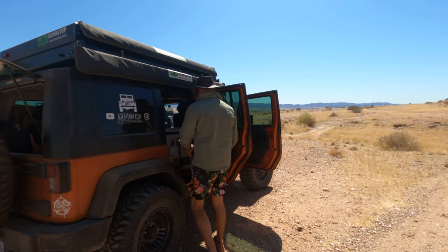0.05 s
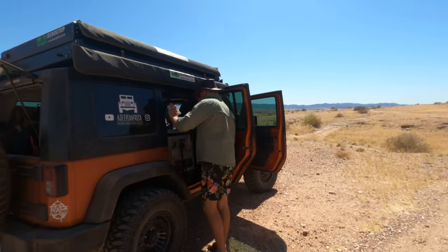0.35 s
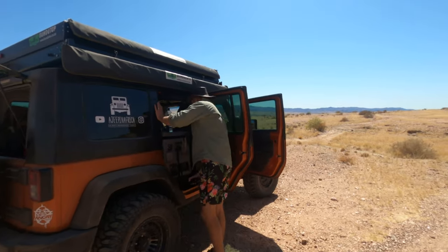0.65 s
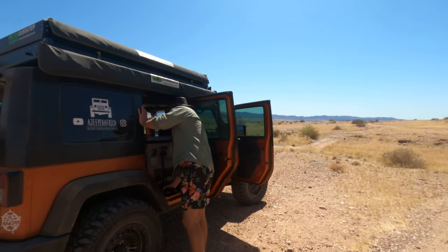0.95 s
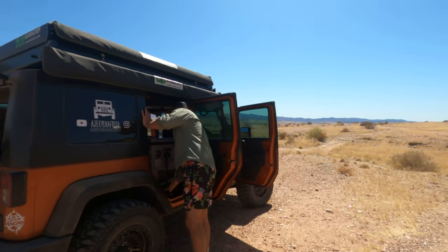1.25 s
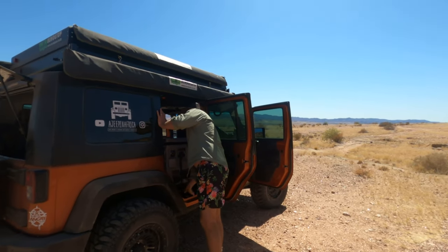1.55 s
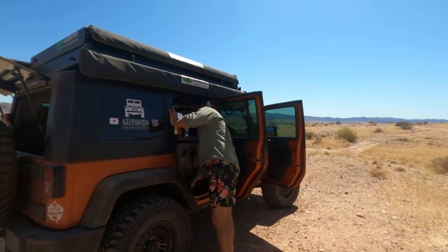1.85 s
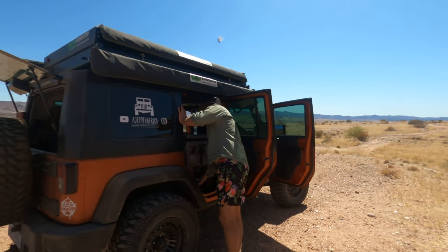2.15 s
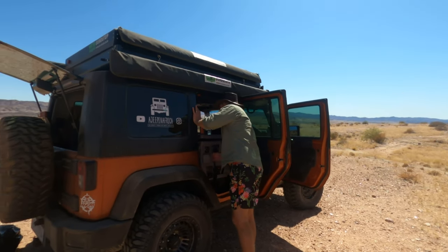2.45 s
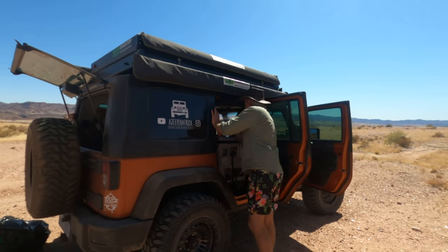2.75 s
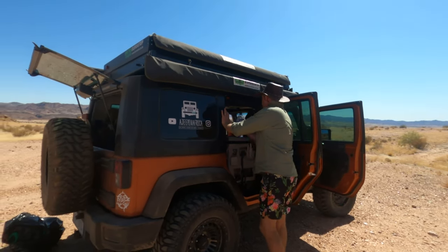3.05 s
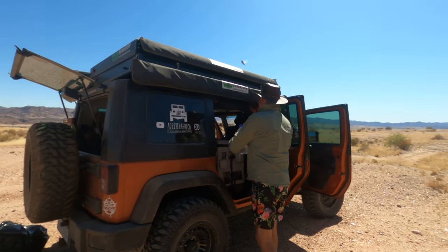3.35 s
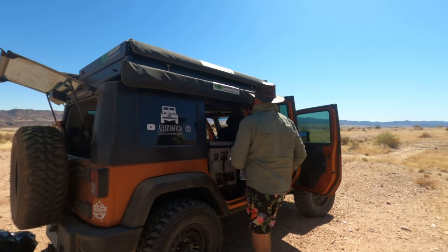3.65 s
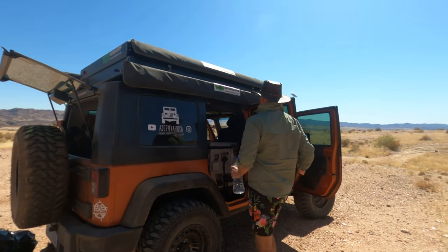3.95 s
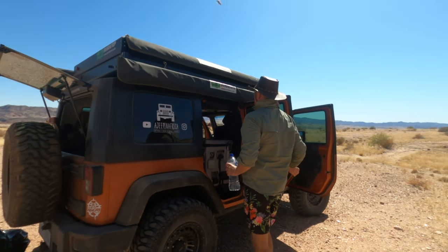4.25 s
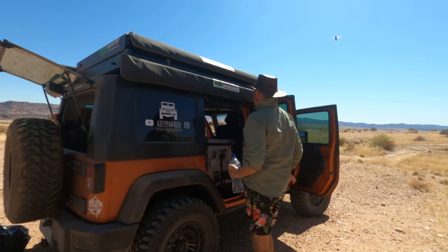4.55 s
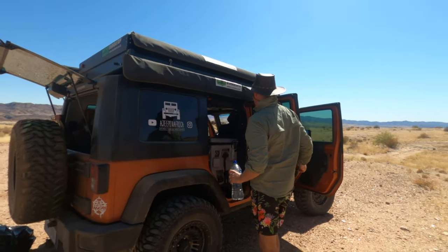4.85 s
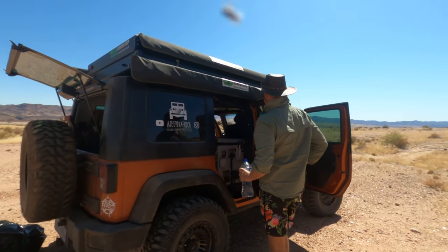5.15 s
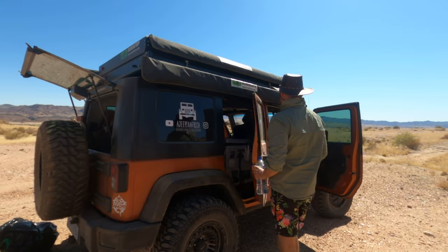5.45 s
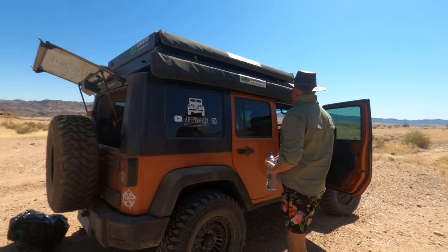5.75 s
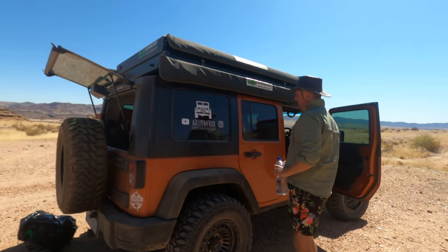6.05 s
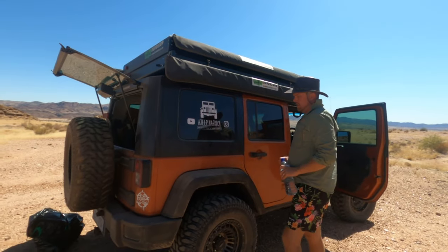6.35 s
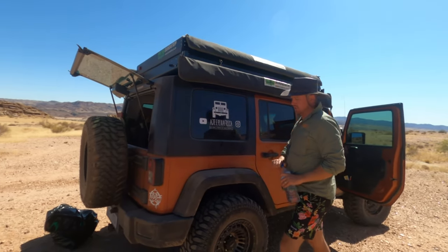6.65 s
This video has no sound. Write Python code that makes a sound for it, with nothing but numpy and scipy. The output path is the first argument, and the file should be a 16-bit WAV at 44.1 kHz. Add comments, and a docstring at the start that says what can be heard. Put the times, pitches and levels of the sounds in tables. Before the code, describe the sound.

Someone digs through the load of a parked vehicle, with rustling clothes, light plastic clicks, hollow knocks and the thump of a closing lid. Gravel crunches underfoot, there is a brief lull, and then a door slams shut, the loudest sound, before some last scuffs and taps. It is heard from a few steps away in the open air, with soft gusts buffeting the microphone.

```python
"""An off-road vehicle stands in open desert; a light breeze buffets the microphone under a faint hiss.
Someone rummages inside: sleeves rub, hollow plastic items tap, cargo knocks, a lid shuts and a buckle
rings once. He steps back over crunching gravel and, near the end, slams the side door:
the latch clashes, the door thuds into its seal, the cabin booms. A few scuffs and taps follow."""
import sys
import numpy as np
from scipy import signal
from scipy.fft import rfft, irfft, next_fast_len
from scipy.io import wavfile
from scipy.ndimage import uniform_filter1d, map_coordinates

SR = 44100
rng = np.random.default_rng(int(sys.argv[2]) if len(sys.argv) > 2 else 0)


def master_out(mix):
    """Clip the mix to full scale and print it as 16-bit PCM to the path in sys.argv[1]."""
    frames = np.transpose(np.atleast_2d(mix))
    ceiling = np.clip(frames, -1, 1)
    pcm = np.round(ceiling * 32767).astype(np.int16)
    wavfile.write(sys.argv[1], SR, pcm)


N = 295470
T = np.arange(SR // 2) / SR  # time within one hit [s]
TOP_HZ = 15800

# low rumble of the breeze: (frequency [Hz], spectral level [dB])
BREEZE_SPECTRUM = [(1, -11.5), (3, 6.5), (9, -4), (14, -13.5), (20, -16), (28, -38.5), (40, -34), (80, -55),
                   (200, -54), (600, -100)]
# gusts and one lull: (time [s], level change [dB], width [s])
BREEZE_GUSTS = [(0.55, 9, 0.28), (0.93, 10.5, 0.11), (1.45, 5.5, 0.21), (2.35, 7.5, 0.25),
                (5.6, 10.5, 0.11), (6.3, -5.5, 0.34)]
# bed of hiss: (frequency [Hz], spectral level [dB])
HISS_SPECTRUM = [(35, -19), (60, -2), (254, -11.5), (292, -9.5), (352, -12.5), (511, -10), (616, -11),
                 (760, -12.5), (1680, -16), (2020, -18), (2430, -17.5), (15700, -27)]
# strokes of a sleeve, packet or sole: (start [s], length [s], rub level [dB], grit level [dB])
RUB_STROKES = [(-0.01, 0.079, -53, -54.5), (0.21, 0.05, -59, -59), (0.28, 0.22, -58.5, -68.5),
               (0.424, 0.043, -50.5, -56), (0.5, 0.077, -64, -71), (0.75, 0.048, -65, -85),
               (0.85, 0.11, -63, -67), (1.17, 0.061, -57.5, -65), (1.34, 0.15, -68, -77),
               (1.765, .19, -59, -64), (1.98, .13, -68.5, -68), (2.68, 0.088, -65.5, -84),
               (3.1, 0.089, -65, -74), (3.192, 0.037, -55.5, -61.5), (3.288, 0.03, -55.5, -63.5),
               (3.35, 0.1, -59.5, -60.5), (3.47, 0.058, -59.5, -65), (3.58, 0.17, -67.5, -64.5),
               (3.715, .14, -57, -63.5), (3.985, .03, -48.5, -56.5), (4.03, 0.032, -54.5, -56.5),
               (4.12, .6, -68.5, -81), (5.745, 0.1, -58, -68), (5.95, 0.12, -47, -57),
               (6.075, .055, -49.5, -50), (6.15, .055, -52, -53), (6.58, .12, -66, -65.5)]
# soft body of a rub: (frequency [Hz], spectral level [dB])
RUB_SPECTRUM = [(90, -12), (220, 1), (430, 0), (590, 0.5), (720, 1), (1050, 0), (1500, -3.5), (2200, -7),
                (4500, -29)]
# crackling grit: (frequency [Hz], spectral level [dB])
GRIT_SPECTRUM = [(200, -12), (600, 8), (1700, -6), (3000, -10.5), (5500, -13), (9000, -18.5), (10500, -23),
                 (15500, -33)]
# hollow plastic items touching: (time [s], peak [dB], pitch [Hz], click against ring [dB])
PLASTIC_TAPS = [(0.012, -35, 1634, 1), (0.061, -37, 1040, 1.5), (0.4724, -34, 1337, -3.5),
                (1.080, -44.5, 884, -1), (2.243, -36.5, 1023, -1.5), (2.9815, -28.5, 790, -15),
                (2.997, -32.5, 1330, -9), (3.012, -40.5, 590, -17), (3.2301, -34, 733, -27),
                (3.252, -32.5, 568, -9), (3.350, -44.5, 590, -4), (3.511, -29.5, 1155, -2.5),
                (3.516, -33, 947, 2.5), (3.553, -30, 1020, 11), (4.697, -51, 800, -6),
                (5.2473, -49.5, 890, 14), (5.791, -36, 1350, -6), (6.047, -33, 846, -1.5),
                (6.516, -42.5, 945, 2)]
# reverb decay of the cabin: (frequency [Hz], t60 [s])
CABIN_DECAY = [(100, 0.55), (400, 0.44), (1500, 0.32), (5000, 0.34), (14000, 0.099)]
# stones underfoot and thin plastic: (time [s], peak [dB], t60 [s], tone centre [Hz])
DRY_CRUNCHES = [(0.243, -40, 0.054, 5030), (1.6653, -35.5, 0.061, 6160), (1.801, -45.5, 0.15, 4150),
                (1.838, -41.5, 0.051, 4200), (2.543, -47.5, 0.056, 7000), (2.664, -44.5, 0.028, 6500),
                (3.545, -40.5, 0.052, 6500), (3.880, -39.5, 0.071, 6000), (3.971, -34.5, 0.057, 1790),
                (3.977, -28, 0.1, 4240), (4.055, -37, 0.099, 2400), (6.242, -42, 0.058, 3500),
                (6.298, -42, 0.16, 2770), (6.447, -47, 0.058, 2160), (6.501, -37.5, 0.047, 4200),
                (6.524, -40, 0.021, 5800), (6.642, -41, 0.015, 3000), (6.665, -41, 0.014, 3500)]
# hollow knocks: cargo bumping, a lid shutting (1.25 s), one footstep (3.97 s):
# (time [s], peak [dB], tone centre [Hz], spread [octaves], clack against ring [dB], damping t60 [s])
HOLLOW_KNOCKS = [(0.4747, -31.5, 470, 0.23, -35, 0.24), (0.4756, -35.5, 218, 0.2, -33, 0.19),
                 (0.785, -47, 260, 0.16, -31, .2), (1.2442, -23.5, 950, 0.98, -8.5, 0.55),
                 (1.2506, -21, 587, 0.71, -22, 3.4), (1.455, -40.5, 174, 0.27, -34, 0.24),
                 (1.467, -38.5, 196, 0.17, -30, 0.34), (1.506, -46, 388, 0.22, -20, .4),
                 (1.533, -43, 400, 0.4, -23, .3), (1.670, -39, 420, 0.63, -30, 0.81),
                 (1.875, -40, 218, 0.27, -7, 0.17), (2.664, -42.5, 500, 0.41, -31, 0.14),
                 (2.985, -42.5, 480, 0.44, -28, 0.11), (3.236, -46, 382, 0.5, -28, 0.17),
                 (3.972, -34.5, 546, 0.37, -22, 0.096), (5.567, -49, 165, 0.48, -23, .6)]
# hollow ring shared by the knocks: (frequency [Hz], level [dB], t60 [s])
KNOCK_MODES = [(122, -18, 0.25), (180, -4, .13), (203, 4, 0.14), (286.7, 5, 0.18), (358, 2, 0.12),
               (386, -10, 0.25), (433, -6.5, 0.22), (515, -0.5, 0.19), (554, 2, 0.16), (724.5, 2, 0.16),
               (869, -3, 0.18), (1264, -8, 0.11), (1388, 3.5, 0.043), (1550, -8, 0.12), (2840, -1, 0.077)]
# heels settling on the ground: (time [s], peak [dB])
HEEL_DROPS = [(1.44, -38.5), (2.815, -50), (3.759, -47), (4.691, -46), (5.56, -41.5)]
# ring of a small metal buckle: (frequency [Hz], level [dB], t60 [s])
BUCKLE_MODES = [(4520, -7, 0.2), (6100, 3, 0.072)]
# latch and window rattling: (time [s], peak [dB], clash against ring [dB], low-pass cutoff [Hz])
LATCH_HITS = [(5.8299, -20.5, -7, 1100), (5.8367, -8.5, 1, 2200), (5.8425, -9, 4.5, 14000),
              (5.8482, -10.5, 13, 14000), (5.853, -15.5, 11, 12000), (5.8750, -16.5, 21, 13000),
              (5.881, -37, 15, 8000), (5.9037, -22, 10, 2200), (5.91, -34, 18, 2200), (5.916, -25, 5, 3500)]
# noisy clash of the latch: (frequency [Hz], spectral level [dB])
CLASH_SPECTRUM = [(90, -26), (160, -3.5), (420, -7.5), (740, -18), (860, -6.5), (1020, -20), (1260, -13),
                  (2650, -17), (4300, -20), (6600, -24), (8800, -20.5), (10200, -34), (12700, -27.5),
                  (15500, -43)]
# ring of the latch steel: (frequency [Hz], level [dB], t60 [s])
STEEL_MODES = [(520, -3, 0.12), (607, -14, 0.2), (817, -4, 0.079), (869, 5.5, 0.09), (1246, -4.5, 0.13),
               (1830, -20.5, 0.09), (2190, -21, 0.11), (2380, -6, 0.071), (3079, -10, 0.07),
               (4280, -8, 0.065), (4970, -19, .11), (5600, -20.5, 0.082), (7800, -29, .08),
               (8580, -13, 0.117), (9100, -6, 0.055)]
# door meeting its seal: (time [s], peak [dB])
DOOR_THUDS = [(5.837, -18), (5.8755, -5.5), (5.8824, -13.5), (5.904, -21.5)]
# ring of the door panel: (frequency [Hz], level [dB], t60 [s])
PANEL_MODES = [(92.7, 3.5, 0.13), (138.5, -6.5, 0.15), (194, -3, 0.17), (250, 2.5, 0.12),
               (265, -2.5, 0.045), (318, -2, 0.045), (400, -5.5, 0.24), (510, -6.5, 0.067),
               (546, -11, 0.16), (677, -7, 0.045)]


def amp(db):
    """Decibels to gain."""
    return 10 ** (np.asarray(db) / 20)


def unit(x):
    """Scale to rms 1."""
    return x / np.sqrt(np.mean(x ** 2) + 1e-20)


def along(points, hz):
    """Read a curve of (frequency [Hz], value) points on a log-frequency axis."""
    point_hz, values = np.transpose(points)
    return np.interp(np.log(hz + 1e-3), np.log(point_hz), values)


def hump(hz, centre_hz, octaves):
    """Broad band-pass EQ curve in dB."""
    return -10 * np.log10(1 + (np.log2(hz / centre_hz) / octaves) ** 4)


def colour(x, spectrum):
    """EQ a signal by (frequency [Hz], level [dB]) points and scale to rms 1."""
    size = next_fast_len(len(x) + 8192)
    gain = amp(along(spectrum, np.fft.rfftfreq(size, 1 / SR)))
    return unit(irfft(rfft(x, size) * gain, size)[:len(x)])


def noise(spectrum, count=len(T)):
    """Coloured noise, one hit long by default."""
    return colour(rng.standard_normal(count), spectrum)


def band(x, hz, kind):
    """Gentle low or high pass."""
    return signal.sosfilt(signal.butter(2, hz, kind, fs=SR, output="sos"), x)


def fade(t60, attack_s):
    """Envelope of one hit."""
    return np.exp(-np.log(1000) * T / t60) * (1 - np.exp(-T / attack_s))


def ring(modes, scatter_db, detune):
    """Damped modes; every contact point excites them a little differently."""
    hz, db, t60 = np.transpose(modes)[:, :, None]
    size, shift = rng.standard_normal((2, len(modes), 1))
    sign = (-1) ** np.arange(len(modes))[:, None]
    swing = np.sin(2 * np.pi * hz * (1 + detune * shift) * T)
    decay = np.exp(-np.log(1000) * T / t60)
    return unit(np.sum(sign * amp(db + scatter_db * size) * decay * swing, axis=0))


def grains(count, per_second, spread_db):
    """Tiny snaps of random size at random moments."""
    snaps = (rng.random(count) < per_second / SR) * rng.standard_normal(count)
    return snaps * amp(spread_db * rng.standard_normal(count))


def place(track, s, peak_db, sound):
    """Mix a hit in at s seconds, peaking at peak_db."""
    part = track[round(s * SR):][:len(sound)]
    part += amp(peak_db) * sound[:len(part)] / (np.abs(sound).max() + 1e-20)


def breeze(calm_db=-35.5):
    """Slow pressure swings that swell in a few gusts."""
    t = np.arange(N) / SR
    gust_db = sum(db * np.exp(-((t - s) / width) ** 2) for s, db, width in BREEZE_GUSTS)
    return amp(calm_db + gust_db) * noise(BREEZE_SPECTRUM, N)


def hiss():
    """A faint, even bed under the whole scene."""
    return amp(-63) * noise(HISS_SPECTRUM, N)


def stroke(start, length, attack_s=0.011, release_t60=0.15):
    """Envelope of one rub: it takes hold, slides on and dies away."""
    t = np.arange(N) / SR - start
    release = np.exp(-np.log(1000) * np.maximum(t - length, 0) / release_t60)
    return np.clip(t / attack_s, 0, 1) * release


def sliding(x, depth_db):
    """Brief resonances come and go as the contact slides over different things."""
    frames = signal.stft(x, nperseg=512)[2]
    patches = uniform_filter1d(rng.standard_normal(frames.shape), size=4, axis=0)  # across frequency
    patches = uniform_filter1d(patches, size=14, axis=1)  # across time
    return unit(signal.istft(frames * amp(depth_db * unit(patches)), nperseg=512)[1][:N])


def catch_and_slip(per_second, depth_db):
    """Smooth random gain of a contact that catches and slips."""
    position = np.arange(N) * per_second / SR
    return amp(depth_db * map_coordinates(rng.standard_normal(N // 100), [position], mode="wrap"))


def shuffling():
    """Sleeves and soles rub stroke by stroke while grit crackles on top."""
    rub = colour(grains(N, per_second=1100, spread_db=1), RUB_SPECTRUM)
    grit = colour(grains(N, per_second=1600, spread_db=-0.5), GRIT_SPECTRUM)
    rub = sliding(rub, depth_db=3)
    grit = sliding(band(grit, 1700, "high"), depth_db=2.5)
    rummage = (0, 2.0, -69, -71.5)  # one long, faint stroke: clothes stir as he digs through the load
    rub_power, grit_power = np.zeros((2, N))
    for s, length, rub_db, grit_db in [*RUB_STROKES, rummage]:
        envelope = stroke(s, length)
        rub_power += (amp(rub_db) * envelope) ** 2
        grit_power += (amp(grit_db) * envelope) ** 2
    friction = np.sqrt(rub_power) * rub + np.sqrt(grit_power) * grit
    return friction * catch_and_slip(per_second=45, depth_db=1)


def taps(t60=0.042):
    """A thin plastic wall rings briefly, with a click on top."""
    out = np.zeros(N)
    for s, db, hz, click_db in PLASTIC_TAPS:
        upper_hz = 1.42 * hz
        upper_db = -6 + hump(upper_hz, centre_hz=775, octaves=0.75)
        modes = [(0.82 * hz, -14, t60), (hz, 0, t60), (upper_hz, upper_db, 0.8 * t60)]
        wall = ring(modes, scatter_db=1, detune=0.01)
        click = noise([(200, -10), (500, 11), (2800, 1), (5000, -14), (9000, -23.5), (15000, -35)])
        place(out, s, db, wall + amp(click_db) * unit(click * fade(t60, 0.00022)))
    return out


def cabin_reverb(send, predelay_s=0.006):
    """The hollow vehicle and the ground answer with a short tail."""
    hz, t, frames = signal.stft(rng.standard_normal(SR), SR, nperseg=256)
    decay = np.exp(-np.log(1000) * t / along(CABIN_DECAY, hz)[:, None])
    tail = signal.istft(frames * decay, SR, nperseg=256)[1]
    response = np.pad(tail, (round(predelay_s * SR), 0)) / np.linalg.norm(tail)
    return signal.fftconvolve(send, response)[:N]


def crunches():
    """Stones and thin plastic give way in dry clumps of tiny snaps."""
    out = np.zeros(N)
    for s, db, t60, centre_hz in DRY_CRUNCHES:
        tone = [(hz, along(GRIT_SPECTRUM, hz) + hump(hz, centre_hz, octaves=1.2))
                for hz in np.geomspace(20, SR / 2, 40)]
        snaps = colour(grains(len(T), per_second=10000, spread_db=3), tone)
        place(out, s, db, snaps * fade(t60, 0.00029))
    return out


def knocks():
    """Cargo, a lid and one footstep: soft hits stir low modes; hard ones reach higher and clack."""
    out = np.zeros(N)
    for s, db, centre_hz, octaves, clack_db, damping_t60 in HOLLOW_KNOCKS:
        tone = [(hz, hump(hz, centre_hz, octaves) - 20 * np.log10(1 + hz / centre_hz))
                for hz in np.geomspace(20, SR / 2, 40)]
        clutter = unit(noise(tone) * fade(0.14, 0.0015))  # loose things shaken by the hit
        clack = noise([(300, -16), (1400, 6.5), (2900, 13.5), (4500, 6.5), (8000, -33), (15000, -40)])
        clack = unit(clack * fade(0.068, 0.00079))
        modes = [(hz, level + hump(hz, centre_hz, octaves), t60) for hz, level, t60 in KNOCK_MODES]
        body = ring(modes, scatter_db=1, detune=0.003)
        knock = body + 0.56 * clutter + amp(clack_db) * clack
        place(out, s, db, knock * fade(damping_t60, 0.00016))
    return out


def footfalls():
    """Each heel sends one dull push through the ground."""
    out = np.zeros(N)
    for s, db in HEEL_DROPS:
        push = noise([(25, -2), (60, 4), (110, -8), (220, -38), (600, -50)])
        place(out, s, db, push * fade(0.115, 0.0067))
    return out


def buckle():
    """One contact sets a small metal buckle ringing."""
    out = np.zeros(N)
    place(out, s=1.667, peak_db=-53, sound=ring(BUCKLE_MODES, scatter_db=-2, detune=0))
    return out


def latch():
    """The latch rides over its striker in a rattle of steel; rubber muffles the light contacts."""
    out = np.zeros(N)
    for s, db, clash_db, cutoff_hz in LATCH_HITS:
        clash = unit(noise(CLASH_SPECTRUM) * fade(0.05, 0.00035))
        steel = ring(STEEL_MODES, scatter_db=1.5, detune=0.002)
        place(out, s, db, band(steel + amp(clash_db) * clash, min(cutoff_hz, TOP_HZ), "low"))
    return out


def door_thuds(seal_hz=250):
    """The door lands: panel and trim shake while the seal gives way for a few cycles."""
    out = np.zeros(N)
    for s, db in DOOR_THUDS:
        trim = noise([(40, -10), (100, 4), (400, 15.5), (900, 6), (3000, -33)])
        trim = unit(trim * fade(0.13, 0.00078))
        panel = ring(PANEL_MODES, scatter_db=0.7, detune=0.002)
        seal = unit(np.sin(2 * np.pi * seal_hz * T) * fade(0.024, 0.003))
        place(out, s, db, panel + 0.99 * seal + 0.5 * trim)
    return out


def cabin_boom(s=5.917, hz=44, peak_db=-20, width_s=0.029):
    """The closing door squeezes the cabin air into one deep pulse."""
    t = np.arange(N) / SR - s
    return -amp(peak_db) * np.exp(-(t / width_s) ** 2) * np.cos(2 * np.pi * hz * t)


def scene():
    """The mono mix, heard a few steps from the vehicle."""
    clatter = knocks() + taps() + buckle()
    slam = latch() + door_thuds() + cabin_boom()
    tail = cabin_reverb(amp(-18) * clatter + amp(-20) * slam)
    movement = shuffling() + crunches() + footfalls()
    return (clatter + slam + tail + movement + breeze() + hiss())[None]


def record(dry):
    """A brick-wall low pass trims the very top."""
    size = next_fast_len(N + SR // 2)
    passband = np.fft.rfftfreq(size, 1 / SR) < TOP_HZ
    return irfft(rfft(dry, size) * passband, size)[..., :N]


dry = scene()
out = record(dry)
master_out(out)
```